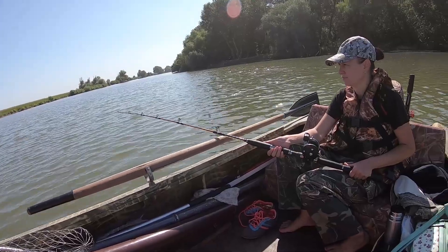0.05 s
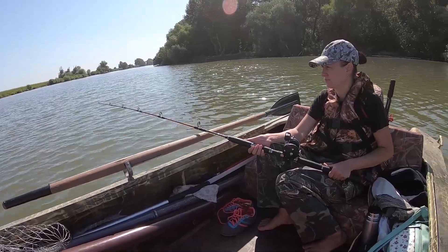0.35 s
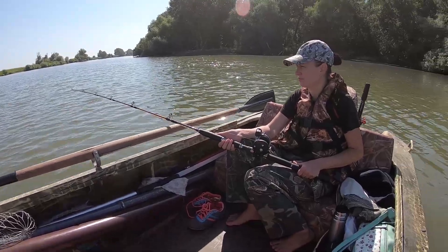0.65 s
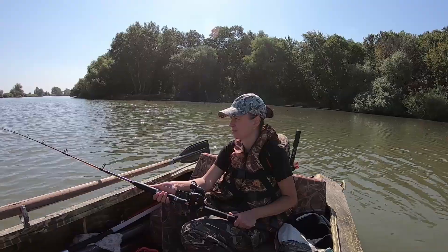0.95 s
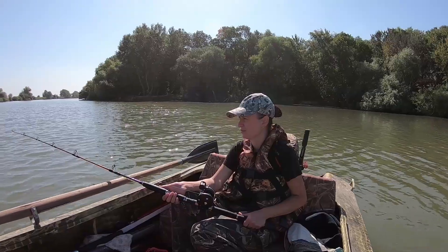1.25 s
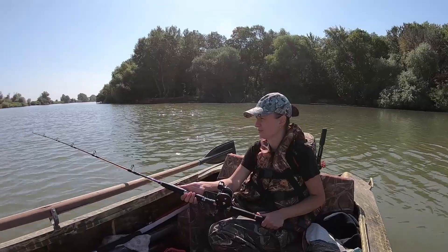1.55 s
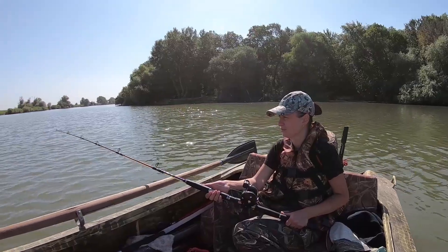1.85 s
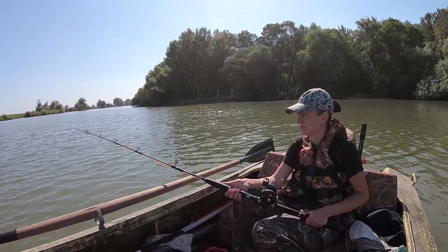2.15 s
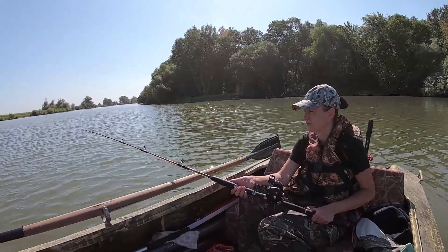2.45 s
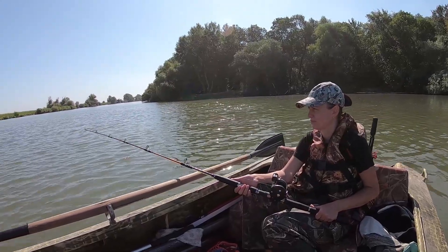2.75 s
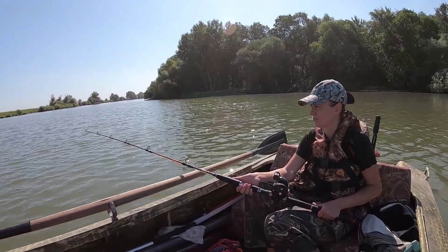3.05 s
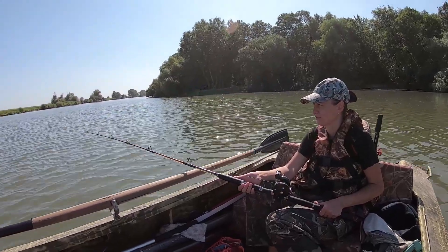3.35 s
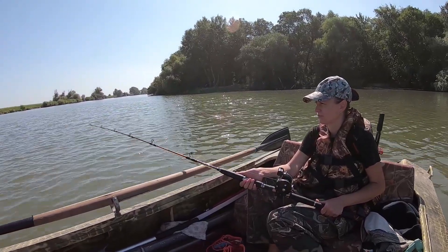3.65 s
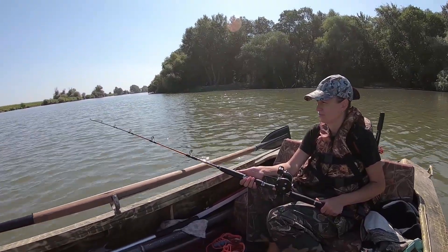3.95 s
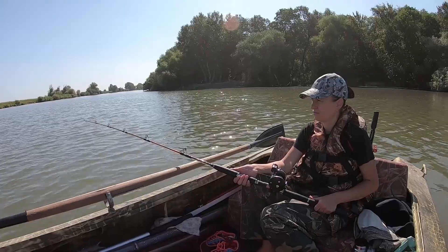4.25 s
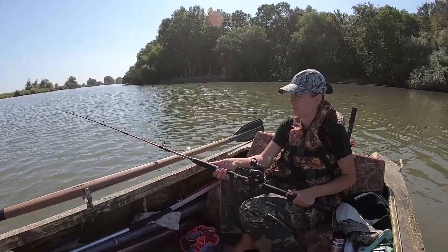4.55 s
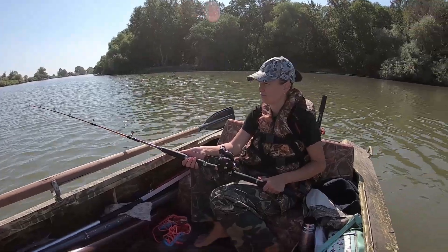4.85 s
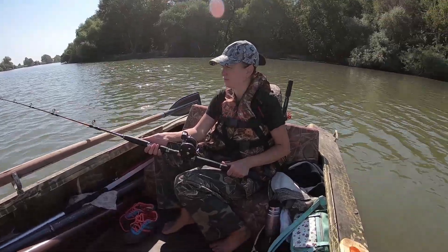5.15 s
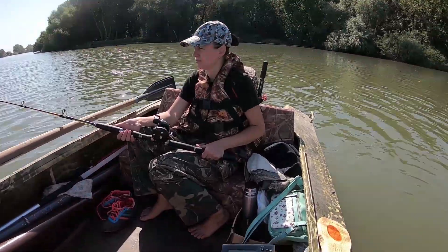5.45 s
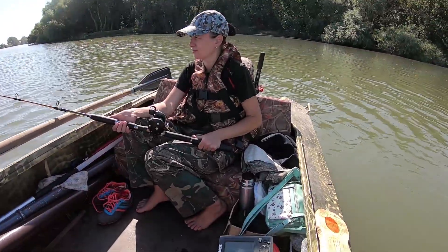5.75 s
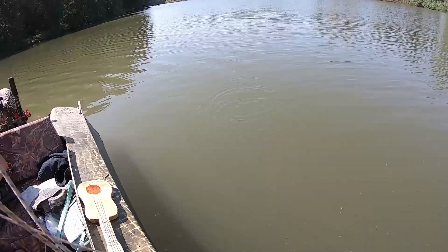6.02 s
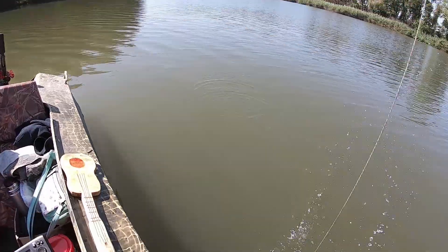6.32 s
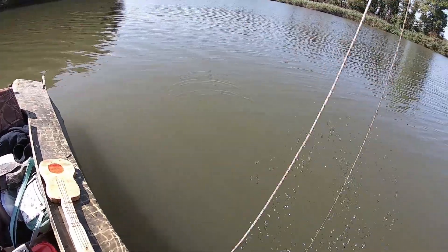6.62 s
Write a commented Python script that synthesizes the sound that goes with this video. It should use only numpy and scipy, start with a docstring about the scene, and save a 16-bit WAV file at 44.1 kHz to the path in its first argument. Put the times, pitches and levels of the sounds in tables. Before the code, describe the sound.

Heard from aboard a drifting wooden boat, small hollow water slaps come at uneven intervals over faint birdsong, soft wind rumble on the microphone and barely audible echo sounder ticks. The slaps die away, followed by a small metal clink and soft handling of tackle. Then a sudden splash straight ahead, much louder than the rest, closes with a low gulp and trails off in bubbling and drips.

```python
"""Water plops against a wooden boat adrift on a calm river: each slap traps air that rings through the hull.
Then something hits the water close by: a splash, a deep gulp as the cavity closes, bubbles ringing as
damped oscillators, and falling drops. Tackle is handled softly, a metal fitting clinks and something rubs
the boat's side. Light wind buffets the microphone, birds whistle from the bank, an echo sounder ticks."""
import sys
import numpy as np
from scipy import signal
from scipy.fft import rfft, irfft, next_fast_len
from scipy.io import wavfile
from scipy.ndimage import map_coordinates

SR = 44100
rng = np.random.default_rng(int(sys.argv[2]) if len(sys.argv) > 2 else 0)


def master_out(mix):
    """Clip the mix to full scale and print it as 16-bit PCM to the path in sys.argv[1]."""
    frames = np.transpose(np.atleast_2d(mix))
    ceiling = np.clip(frames, -1, 1)
    pcm = np.round(ceiling * 32767).astype(np.int16)
    wavfile.write(sys.argv[1], SR, pcm)


N = 298998
TIME = np.arange(N) / SR
AGE = np.arange(SR // 3) / SR  # time since an impact [s]
ENTRY_S, REBOUND_S = 6.084, 6.312  # the surface breaks; the closed cavity throws water up again


def amp(db):
    """Amplitude ratio of a level in decibels."""
    return 10 ** (np.asarray(db) / 20)


def unit(x):
    """Normalisation to rms 1."""
    return x / np.sqrt(np.mean(x ** 2) + 1e-20)


def along(points, hz):
    """Interpolation of (frequency [Hz], value) points on a logarithmic frequency axis."""
    f, v = np.transpose(points)
    return np.interp(np.log(hz + 1), np.log(f + 1), v)


def curves(rows):
    """Linear interpolation in time: one value per sample for each column after the first."""
    s, *columns = np.transpose(rows)
    return [np.interp(TIME, s, column) for column in columns]


def wobble(rate):
    """Random modulation: a smooth curve through rate Gaussian knots a second."""
    coarse = TIME[::32]
    knots = rng.standard_normal(int(N * rate / SR) + 4)
    return np.interp(TIME, coarse, map_coordinates(knots, [coarse * rate]))


def envelope(start, attack, hold, fall_db_per_s):
    """Linear attack, hold and exponential decay; times in seconds."""
    age = TIME - start
    return np.clip(age / attack, 0, 1) * amp(-fall_db_per_s * np.maximum(age - attack - hold, 0))


def add(track, s, sound):
    """Superposition of a sound on a track at time s."""
    part = track[..., max(round(s * SR), 0):][..., :sound.shape[-1]]
    part += sound[..., :part.shape[-1]]


def filtered(x, response):
    """Zero-phase filtering: the spectrum is multiplied by a frequency response."""
    m = next_fast_len(N + SR // 4)
    return irfft(rfft(x, m) * response(np.fft.rfftfreq(m, 1 / SR)), m)[..., :N]


def band(x, hz, octaves, order):
    """Causal Butterworth band-pass around hz."""
    edges = np.minimum(hz * 2 ** (np.array([-.5, .5]) * octaves), [SR / 2 - 2000, SR / 2 - 1000])
    return signal.sosfilt(signal.butter(order, edges, "band", fs=SR, output="sos"), x)


def swept(x, hz, width, order):
    """Heterodyne band-pass that follows the curve hz; width is a share of its starting frequency."""
    carrier = np.exp(2j * np.pi * np.cumsum(hz) / SR)
    low = signal.butter(order, width * hz[0] / 2, fs=SR, output="sos")
    return 2 * np.real(carrier * signal.sosfilt(low, x / carrier))


def rush(spectrum, coherence):
    """Coloured stereo noise, rms 1; the balance of mid and side sets the left-right coherence."""
    def response(hz):
        angle = np.arccos(np.clip(along(coherence, hz), -1, 1)) / 2
        return amp(along(spectrum, hz)) * [np.cos(angle), np.sin(angle)]
    mid, side = filtered(rng.standard_normal((2, N)), response)
    return unit(np.array([mid + side, mid - side]))


def burst(t60, t=AGE):
    """White noise in exponential decay, 60 dB in t60 seconds."""
    return rng.standard_normal(len(t)) * amp(-60 * t / t60)


def tick(hz, octaves, t60):
    """An impact transient: a band-limited noise burst, peak 1."""
    click = band(burst(t60, AGE[:SR // 10]), hz, octaves, order=3)
    return click / abs(click).max()


def crackle(per_s, hz, octaves, order, t60=0.026):
    """Shot noise, rms 1: tiny impacts arrive as a Poisson process."""
    chance, size = rng.random((2, N))
    impacts = (chance < per_s / SR) * size ** 2
    decays = signal.oaconvolve(impacts, amp(-60 * AGE[:SR // 50] / t60))[:N]
    return unit(band(decays * rng.standard_normal(N), hz, octaves, order))


def oscillator(hz, t60, swell_s, octaves_per_s=0):
    """A damped oscillation with a soft onset, peak 1; any glide stops after t60 seconds."""
    pitch = hz * 2 ** (octaves_per_s * np.minimum(AGE, t60))
    shape = amp(-60 * AGE / t60) * (1 - np.exp(-(AGE / swell_s) ** 2))
    return shape / shape.max() * np.sin(2 * np.pi * np.cumsum(pitch) / SR)


def hull(ring_scale, spread_db=3.0, build_s=0.0019, mode_life_scale=0.88):
    """The boat's impulse response: plank modes in a dense wash, with damping that grows with frequency."""
    # normal modes of the hull: (frequency [Hz], relative level [dB])
    plank_modes = [(192, -1.5), (265, -7), (325, -2.5), (555, -8), (632, 0.5), (705, -3.5), (810, 4),
                   (880, 1), (1110, -4.5), (1230, -4.5), (1345, 2.5), (1430, 1), (1540, -2.5), (1750, -5),
                   (2750, 2.5), (3000, 5.5), (3300, 3.5)]
    # damping of the hull: (frequency [Hz], 60 dB decay time before scaling [s])
    decay_times = [(200, 0.41), (400, 0.37), (800, 0.15), (1500, 0.14), (3000, 0.13), (9000, 0.018)]
    hz, t, spectra = signal.stft(rng.standard_normal(len(AGE)), SR, nperseg=256)
    wash_t60 = ring_scale * along(decay_times, hz)[:, None]
    wash = signal.istft(spectra * amp(-60 * t / wash_t60), SR, nperseg=256)[1][:len(AGE)]
    mode_hz, mode_db = np.transpose(plank_modes)
    gain = amp(mode_db + spread_db * rng.standard_normal(len(mode_hz)))
    mode_t60 = mode_life_scale * ring_scale * along(decay_times, mode_hz)[:, None]
    phase = 2 * np.pi * (np.outer(mode_hz, AGE) + rng.random((len(mode_hz), 1)))
    modes = gain @ (amp(-60 * AGE / mode_t60) * np.sin(phase))
    return (wash + modes / 10) * (1 - np.exp(-AGE / build_s))


def plop(hz, fall_octaves, db, upper_db, smack_db, ring_scale, sink_s=0.034, upper_ratio=2.245):
    """Cavity resonance: a slap squeezes an air pocket whose pitch sinks; the hull thuds, then booms."""
    def unit_onset(x):
        return x / np.sqrt(np.mean(x[:SR // 40] ** 2))
    boat = hull(ring_scale)
    pitch = hz * 2 ** (-fall_octaves * (1 - np.exp(-AGE / sink_s)))
    pocket = unit_onset(swept(boat, pitch, width=0.53, order=4))
    upper = amp(upper_db) * unit_onset(swept(boat, pitch * upper_ratio, width=0.54, order=3))
    smack = amp(smack_db) * unit_onset(band(boat, hz=4420, octaves=0.68, order=4))
    force_db = db + 42  # relative to a firm slap; the hull's level grows more slowly than the pocket's
    thud = amp(-48 + 0.67 * force_db) * unit_onset(band(boat, hz=480, octaves=1.46, order=3))
    boom = band(boat, hz=200, octaves=0.57, order=2) * (1 - np.exp(-AGE / 0.05))
    boom = amp(-54.5 + 0.62 * force_db) * boom / np.std(boom[:SR // 10])
    return amp(db) * (pocket + upper + smack) + thud + boom


def slaps(fizz_db=-78):
    """Impulsive excitation: water strikes the hull and fizzes; under firm slaps trapped air rings on."""
    # slaps of water: (time [s], pocket's starting frequency [Hz], fall [octaves], level [dB],
    # upper resonance relative to the pocket [dB])
    strikes = [(0.0, 1290, 0.72, -50.5, -6.5), (0.411, 1350, 0.25, -64, 2), (0.505, 2050, 0.51, -54, 3.5),
               (0.516, 1280, 0.19, -49.5, 6.5), (0.754, 1160, 0.15, -77.5, 19),
               (1.18, 1586, 0.39, -41, -24), (1.676, 1710, 0.32, -66, -0.5),
               (1.870, 1067, 0.51, -35.5, -25), (2.391, 1846, 0.43, -40, -25.5),
               (2.865, 1530, .3, -67.5, -2.5), (2.943, 2150, 0.3, -65.5, 1), (2.983, 1120, 0.73, -47.5, 0),
               (3.403, 1290, 1.25, -36.5, -16), (3.523, 1394, 0.69, -46, -22.5),
               (3.916, 1440, 0.19, -44.5, -3.5), (4.373, 1430, 0.21, -64, -5.5)]
    # ringing air pockets: (time [s], starting frequency [Hz], peak level [dB], life [cycles])
    pockets = [(1.186, 1493, -42, 110), (1.875, 798, -29.5, 71), (2.394, 1453, -33.5, 110),
               (3.406, 1347, -37.5, 35), (3.414, 723, -30, 44), (3.42, 558, -38, 35),
               (3.526, 1228, -40.5, 125), (3.917, 1344, -39, 85)]
    out = np.zeros(N)
    for s, hz, fall_octaves, db, upper_db in strikes:
        fizz = band(burst(t60=0.089), hz=7500, octaves=0.55, order=3)
        add(out, s, amp(fizz_db) * fizz / np.std(fizz[:SR // 50]))
        add(out, s, plop(hz, fall_octaves, db, upper_db, smack_db=-35.5, ring_scale=0.89))
    for s, hz, db, cycles in pockets:
        add(out, s, amp(db) * oscillator(hz, t60=cycles / hz, swell_s=0.0069, octaves_per_s=-0.64))
    return out


def wind(eddy_db=4, eddies_per_s=13, lean_db=2):
    """Turbulent pressure: quick eddies buffet the microphone's two ports unevenly."""
    # strength of the wind: (time [s], level [dB])
    gusts = [(0.0, -59), (0.4, -41.5), (0.53, -49.5), (0.72, -35.5), (0.86, -60), (1.28, -58),
             (1.72, -44.5), (2.13, -71), (2.6, -62.5), (2.96, -44.5), (3.13, -63.5), (3.33, -49),
             (3.85, -78), (4.36, -54), (4.44, -69.5), (5.14, -37), (5.57, -52.5), (5.67, -45.5),
             (5.93, -63.5), (6.14, -52.5), (6.35, -32.5), (6.47, -75), (6.78, -48)]
    # spectrum of the buffeting: (frequency [Hz], relative spectral density [dB])
    spectrum = [(10, -19.5), (22, -1), (45, 2), (70, -4.5), (100, -10.5), (160, -23), (280, -39.5),
                (450, -48), (900, -102)]
    gust_db, = curves(gusts)
    gain = amp(gust_db + eddy_db * wobble(eddies_per_s))
    buffet = rush(spectrum, coherence=[(30, 0.4), (70, 0.4), (150, 0.36)])
    return gain * buffet * amp([[-lean_db], [lean_db]])


def river(hiss_lift_db=1.7):
    """Diffuse, weakly coherent noise: ripples murmur under the hull and the banks hiss."""
    # background of the river: (time [s], lapping level [dB], hiss level before its lift [dB])
    levels = [(0.0, -48.5, -73), (0.49, -73.5, -71), (0.98, -70, -72.5), (1.97, -73.5, -70),
              (2.22, -72, -73.5), (3.1, -64.5, -73), (3.71, -70, -70), (4.6, -72, -74.5),
              (5.15, -60.5, -73), (5.6, -67, -74), (6.05, -68, -75.5)]
    # spectrum of the ripples: (frequency [Hz], relative spectral density [dB])
    lapping_spectrum = [(90, -25.5), (140, 2.5), (195, 0.5), (300, -8.5), (450, -21), (900, -50.5)]
    # spectrum of the hiss: (frequency [Hz], relative spectral density [dB])
    hiss_spectrum = [(150, -5.5), (400, -7.5), (750, 3), (1100, -3.5), (1600, -5.5), (2500, -9),
                     (4200, -13), (5500, -17.5), (8000, -20.5), (10500, -27.5), (12500, -72),
                     (16000, -29.5)]
    # left-right likeness of the hiss: (frequency [Hz], coherence [0-1])
    hiss_coherence = [(200, 0.091), (1000, 0.021), (4000, 0.25), (12000, 0.053)]
    lapping_db, hiss_db = curves(levels)
    ripples = amp(lapping_db + 1.7 * wobble(5.8)) * rush(lapping_spectrum, coherence=[(200, 0.11)])
    hiss = amp(hiss_db + hiss_lift_db + 0.32 * wobble(2.23)) * rush(hiss_spectrum, hiss_coherence)
    return ripples + hiss


def tackle(crinkle_db=2.0):
    """Contact noise: handled rod and line give a fine, uneven crackle and a few light ticks."""
    # hands shifting on the tackle: (time [s], hold [s], level [dB])
    rustles = [(0.0, 0.64, -76), (1.67, 0.25, -81), (5.038, 0.033, -79), (5.342, 0.13, -80)]
    # ticks of the tackle: (time [s], frequency [Hz], peak level [dB])
    ticks = [(0.012, 4300, -46.5), (0.038, 2190, -46.5), (0.096, 5000, -52), (0.315, 4770, -59),
             (0.794, 3900, -61), (5.055, 5200, -54), (5.074, 6250, -65.5), (5.208, 5270, -61.5),
             (5.351, 3000, -55)]
    moves = sum(amp(db) * envelope(s, attack=0.006, hold=hold, fall_db_per_s=109)
                for s, hold, db in rustles)
    out = moves * amp(crinkle_db * wobble(45)) * crackle(per_s=990, hz=4900, octaves=1.68, order=3)
    for s, hz, db in ticks:
        add(out, s, amp(db) * tick(hz, octaves=1.5, t60=0.052))
    return out


def echo_sounder(db=-63, pings_per_s=5):
    """Periodic excitation: the transducer gives a faint, damped tick at every ping."""
    out = np.zeros(N)
    ping = amp(db) * oscillator(hz=1525, t60=0.031, swell_s=0.0012)
    for s in np.arange(0, N / SR, 1 / pings_per_s):
        add(out, s, ping)
    return out


def bubbles(swell_cycles=1.1, rise_octaves_per_s=2.46):
    """Bubble resonance: air is the spring, water the mass; the pitch sharpens as the bubble rises."""
    # single bubbles and ringing droplets:
    # (time [s], starting frequency [Hz], peak level [dB], life [cycles])
    rings = [(0.005, 329, -42.5, 82), (0.439, 217, -42.5, 60), (6.085, 1706, -22, 107),
             (6.087, 870, -21, 8.6), (6.093, 580, -26, 33), (6.091, 2460, -24, 52),
             (6.101, 1174, -12.5, 25), (6.113, 2400, -23, 26), (6.118, 600, -23, 26),
             (6.141, 1850, -39, 60), (6.171, 1800, -38, 82), (6.238, 720, -45, 25), (6.257, 1130, -35, 25),
             (6.266, 2920, -34.5, 63), (6.314, 1700, -30.5, 110), (6.337, 2700, -53, 45),
             (6.29, 572, -33, 35), (6.340, 784, -33, 71), (6.347, 990, -31.5, 29), (6.351, 2120, -59, 55),
             (6.369, 2500, -35, 37), (6.379, 1600, -20.5, 30), (6.396, 1406, -27, 57), (6.41, 510, -37, 32),
             (6.401, 2440, -35, 70), (6.415, 8050, -36, 78), (6.425, 1190, -24, 34), (6.433, 2680, -37, 42),
             (6.451, 1276, -23, 63), (6.452, 2720, -38, 56), (6.466, 5930, -36, 41), (6.470, 1230, -23, 50),
             (6.480, 3300, -31, 63), (6.483, 1490, -18.5, 39), (6.4967, 2680, -20, 32),
             (6.497, 1236, -29, 83), (6.509, 2540, -28, 34), (6.533, 1130, -33, 20), (6.534, 2010, -35, 31),
             (6.553, 2360, -34, 50), (6.583, 2170, -31, 44), (6.666, 1700, -35, 16), (6.694, 2080, -33, 28)]
    out = np.zeros(N)
    for s, hz, db, cycles in rings:
        add(out, s, amp(db) * oscillator(hz, cycles / hz, swell_cycles / hz, rise_octaves_per_s))
    return out


def bird_note(pitch, waver, fade, waver_rate):
    """Random frequency modulation of a thin whistle; a fast waver makes it raspy."""
    drift = 1 + waver * map_coordinates(rng.standard_normal(200), [TIME[:len(pitch)] * waver_rate])
    return signal.windows.tukey(len(pitch), fade) * np.sin(2 * np.pi * np.cumsum(pitch * drift) / SR)


def trees(song, t60, build_s=0.033):
    """Multiple scattering: the wooded bank returns a diffuse stereo echo."""
    tails = np.array([burst(t60), burst(t60)]) * (1 - np.exp(-AGE / build_s))
    return signal.oaconvolve(song[None], tails / np.linalg.norm(tails[0]), axes=1)[:, :N]


def birds(from_hz=6900, rest_hz=5050, fade_db_per_s=16, chirp_s=0.085, arch_hz=110, flutter_db=3.5):
    """Gliding tones: whistles sink and fade; chirps from deeper in the trees carry more reverberation."""
    # one bird's whistles: (time [s], length [s], time constant of the fall [s], relative level [dB])
    whistle_calls = [(0.549, 0.19, .135, -67.5), (0.892, 0.55, 0.16, -69.5), (2.17, .48, .19, -73.5),
                     (4.79, 0.5, .2, -70.5)]
    # other birds' chirps: (time [s], glide start [Hz], glide end [Hz], relative level [dB])
    chirp_calls = [(1.089, 3770, 4170, -69), (1.689, 4340, 4120, -67), (1.98, 4110, 4150, -72),
                   (2.191, 3930, 4140, -71), (2.977, 3960, 4070, -71), (3.259, 3850, 3850, -71),
                   (3.599, 4150, 4370, -78), (3.83, 3960, 4060, -71), (3.982, 3200, 4960, -61),
                   (4.469, 7300, 6570, -78), (4.84, 3250, 3010, -77), (5.079, 4100, 3580, -77),
                   (5.85, 7700, 7100, -80.5)]
    whistles, chirps = np.zeros((2, N))
    for s, length, fall_s, db in whistle_calls:
        t = TIME[:int(length * SR)]
        pitch = rest_hz + (from_hz - rest_hz) * np.exp(-t / fall_s)
        whistle = bird_note(pitch, waver=0.003, fade=0.08, waver_rate=250)
        add(whistles, s, amp(db - fade_db_per_s * t) * whistle)
    bend = np.linspace(0, 1, int(chirp_s * SR)) ** 1.5
    arch = arch_hz * (np.sin(np.pi * bend) - 2 / np.pi)
    for s, start_hz, end_hz, db in chirp_calls:
        pitch = start_hz + (end_hz - start_hz) * bend + arch
        add(chirps, s, amp(db) * bird_note(pitch, waver=0.015, fade=0.3, waver_rate=400))
    whistles *= amp(flutter_db * wobble(45))
    chirps *= amp(flutter_db * wobble(70))
    return (amp(-5) * whistles + amp(-8) * trees(whistles, t60=0.34)
            + amp(-6) * chirps + amp(-4) * trees(chirps, t60=0.27))


def gulps(churn_db=-19, heave_db=-24, heave_t60=0.38):
    """Cavity collapse: one deep, sagging pulse with churning water around it and a slow heave after."""
    # closing cavities: (time [s], peak level of the pulse [dB])
    closures = [(1.311, -39.5), (6.275, -13)]
    out = np.zeros(N)
    for s, db in closures:
        pulse = oscillator(hz=134.7, t60=0.041, swell_s=0.009, octaves_per_s=-9.7)
        churn = band(burst(t60=0.23), hz=150, octaves=1.26, order=2)
        churn *= amp(churn_db) / np.std(churn[:SR // 40])
        heave = unit(band(rng.standard_normal(len(AGE)), hz=70, octaves=5.8, order=2))
        heave *= amp(heave_db - 60 * AGE / heave_t60)
        add(out, s, amp(db) * (pulse + churn + heave))
    return out


def clink(at_s=4.45, left_db=-13, right_db=3):
    """Free vibration: a small metal fitting clicks and rings briefly, close on the right."""
    # modes of the fitting: (frequency [Hz], peak level before panning [dB], 60 dB decay time [s])
    modes = [(1497, -36, 0.07), (3050, -41.5, 0.02)]
    out = np.zeros(N)
    for hz, db, t60 in modes:
        add(out, at_s, amp(db) * oscillator(hz, t60, swell_s=0.00024))
    add(out, at_s, amp(-43) * tick(hz=4660, octaves=2.1, t60=0.0059))
    return out * amp([[left_db], [right_db]])


def rub(rough_db=1):
    """Friction: soft pushes along the boat's side excite a narrow resonance."""
    # pushes along the side: (time [s], hold [s], level [dB])
    pushes = [(5.342, 0.025, -63), (5.4, .012, -69), (5.45, 0.014, -61)]
    gain = sum(amp(db) * envelope(s, attack=0.011, hold=hold, fall_db_per_s=330)
               for s, hold, db in pushes)
    roughness = amp(rough_db * wobble(150))
    return gain * roughness * unit(band(rng.standard_normal(N), hz=1400, octaves=0.26, order=2))


def bubble_cloud(centre_hz, octaves, cycles, spread_db, count, tilt=0.77, rise=0.052):
    """Constant-Q bubble resonances from the entry on, rms 1; big, low ones ring louder and longer."""
    t = AGE[:SR // 50]
    when, strength, up, down = rng.random((count, 4)).T
    hz = centre_hz * 2 ** (octaves * (up - down))
    turns = np.outer(hz, t)
    life = turns / cycles
    phase = 2 * np.pi * turns * (1 + rise * np.minimum(life, 1))
    rings = amp(-60 * life) * (1 - np.exp(-turns)) * np.sin(phase)
    gain = amp(-spread_db * np.log(strength + 0.041)) * (centre_hz / hz) ** tilt
    onsets = (ENTRY_S * SR + when * (N - ENTRY_S * SR)).astype(int)
    samples = onsets[:, None] + np.arange(len(t))
    cloud = np.bincount(samples.ravel(), (rings * gain[:, None]).ravel(), N)[:N]
    return cloud / np.std(cloud[onsets.min():])


def splash():
    """Impact and air entrainment: spray and bubbles surge at entry and rebound; droplets patter down."""
    # spectrum of the spray: (frequency [Hz], relative spectral density [dB])
    spectrum = [(60, 1), (120, 2), (300, -3), (430, -4.5), (600, -3), (900, -6), (1800, -1.5), (3200, -7.5),
                (5500, -20.5), (7500, -21), (11000, -42), (16000, -52.5)]
    spray = rush(spectrum, coherence=[(2000, 1.0), (4000, 1.0), (8000, 0.96), (15000, 0.85)])
    spray *= amp(0.74 * wobble(130))
    spray *= (amp(-38) * envelope(ENTRY_S, attack=0.0012, hold=0.15, fall_db_per_s=234)
              + amp(-48) * envelope(REBOUND_S, attack=0.063, hold=0.028, fall_db_per_s=20))
    froth = bubble_cloud(centre_hz=1743, octaves=1.724, cycles=31, spread_db=4, count=1300)
    froth *= (amp(-33) * envelope(ENTRY_S, attack=0.0017, hold=0.0027, fall_db_per_s=89)
              + amp(-39.5) * envelope(REBOUND_S, attack=0.036, hold=0.089, fall_db_per_s=250))
    plinks = bubble_cloud(centre_hz=4500, octaves=1.1, cycles=28, spread_db=6, count=600)
    plinks *= (amp(-50) * envelope(ENTRY_S, attack=0.0016, hold=0.12, fall_db_per_s=300)
               + amp(-47) * envelope(REBOUND_S, attack=0.025, hold=0.043, fall_db_per_s=69))
    patter = crackle(per_s=300, hz=6000, octaves=1.36, order=2)
    patter *= amp(-61) * envelope(REBOUND_S, attack=0.037, hold=0.14, fall_db_per_s=43)
    return spray + froth + plinks + patter


def cracks():
    """Impact transients: water strikes water so briefly that the sound is a sharp crack."""
    # cracks of water: (time [s], frequency [Hz], peak level [dB])
    impacts = [(6.084, 8900, -35), (6.191, 3600, -41), (6.25, 3640, -30), (6.268, 6400, -35.5),
               (6.31, 7500, -55), (6.319, 4740, -40), (6.347, 6400, -50), (6.361, 4980, -46),
               (6.369, 3600, -39), (6.372, 5600, -32), (6.38, 6900, -42.5), (6.412, 4000, -47),
               (6.438, 3800, -37), (6.4661, 4900, -27), (6.483, 5000, -36), (6.493, 5270, -33),
               (6.557, 5270, -35), (6.651, 3380, -46), (6.67, 3350, -32)]
    out = np.zeros(N)
    for s, hz, db in impacts:
        add(out, s, amp(db) * tick(hz, octaves=0.89, t60=0.0049))
    return out


def plunge(delay_s=0.0089):
    """Resonance of the open cavity: its note sinks as it deepens and stops as the walls narrow."""
    out = np.zeros(N)
    note = amp(-25) * oscillator(hz=880, t60=0.066, swell_s=0.02, octaves_per_s=-15)
    add(out, ENTRY_S + delay_s, note)
    return out * envelope(ENTRY_S, attack=0.0056, hold=0.053, fall_db_per_s=700)


def drops():
    """Air-pocket resonance: big drops falling back sound like slaps, brighter and cut short."""
    # falling drops: (time [s], level [dB], smack of contact relative to the pocket [dB])
    landings = [(6.582, -42, -9), (6.61, -51, -11), (6.666, -43, -41), (6.694, -46, -40)]
    out = np.zeros(N)
    for s, db, smack_db in landings:
        drop = plop(hz=2120, fall_octaves=0.83, db=db, upper_db=-7.5, smack_db=smack_db, ring_scale=0.39)
        add(out, s, drop)
    return out


def boat_sides(sound):
    """Early reflections: the boat's sides scatter a sound and widen it in stereo."""
    # response of the reflections: (frequency [Hz], gain [dB])
    scatter = [(200, -15.5), (700, -6), (1300, -5), (2400, -5.5), (8000, 2)]
    walls = burst(t60=0.029, t=AGE[:SR // 20])
    reflected = signal.oaconvolve(sound, walls / np.linalg.norm(walls))[:N]
    side = filtered(reflected, lambda hz: amp(along(scatter, hz)))
    return np.array([sound + side, sound - side])


def scene():
    """Superposition of the boat's sounds, the splash straight ahead and the river's surroundings."""
    boat = boat_sides(slaps() + rub() + tackle())
    water = splash() + plunge() + gulps() + bubbles() + cracks() + drops()
    return boat + water + clink() + birds() + echo_sounder() + wind() + river()


def record(dry):
    """Band limiting: an ideal low-pass filter removes the highest treble."""
    top_hz = 16300
    return filtered(dry, lambda hz: hz < top_hz)


dry = scene()
out = record(dry)
master_out(out)
```